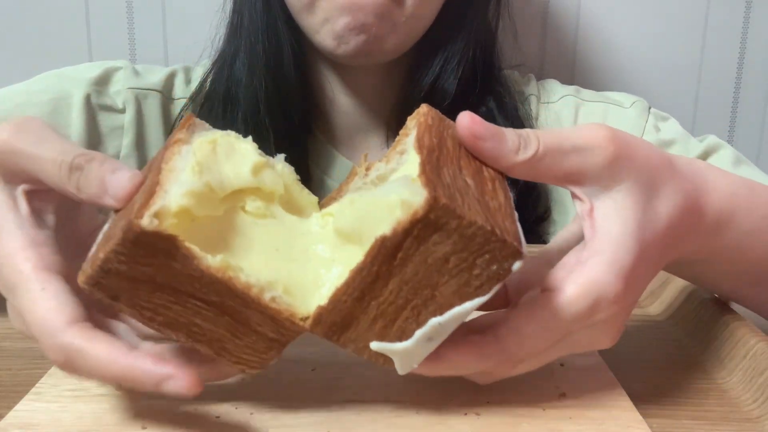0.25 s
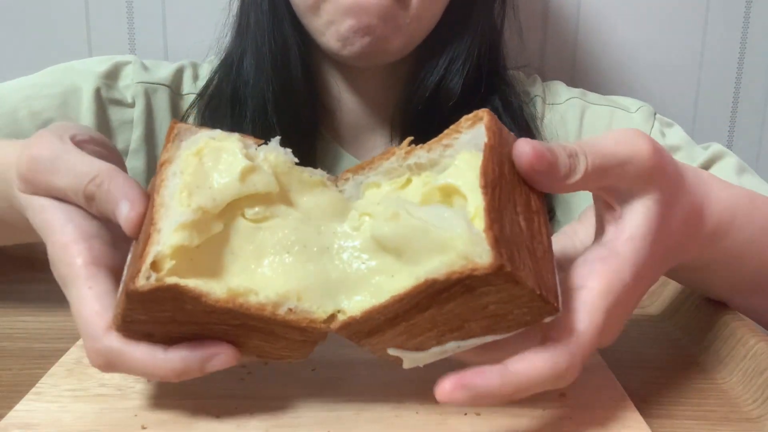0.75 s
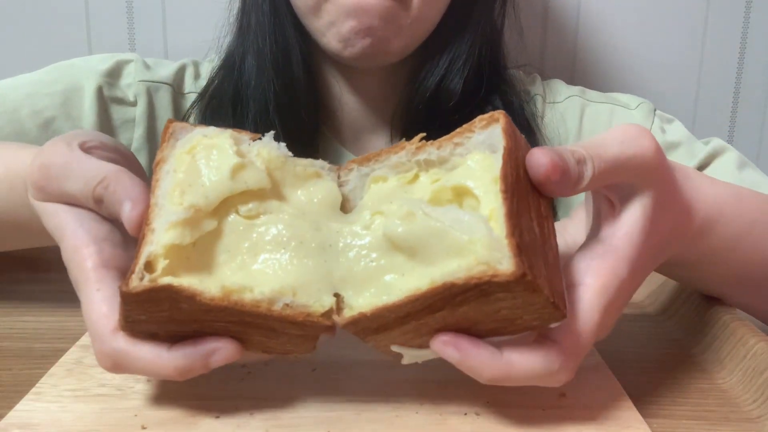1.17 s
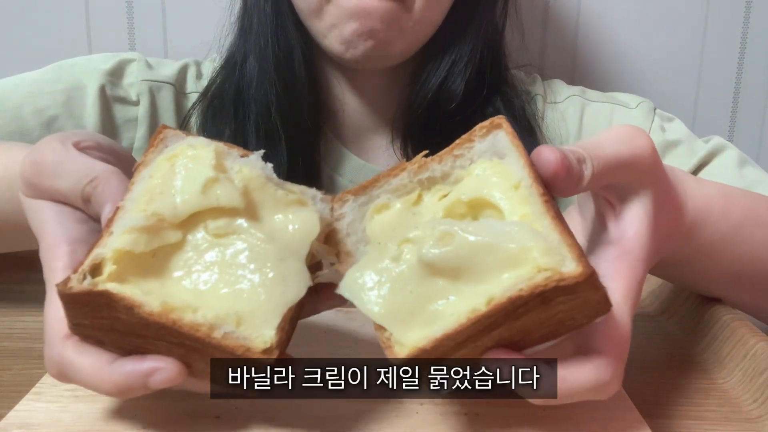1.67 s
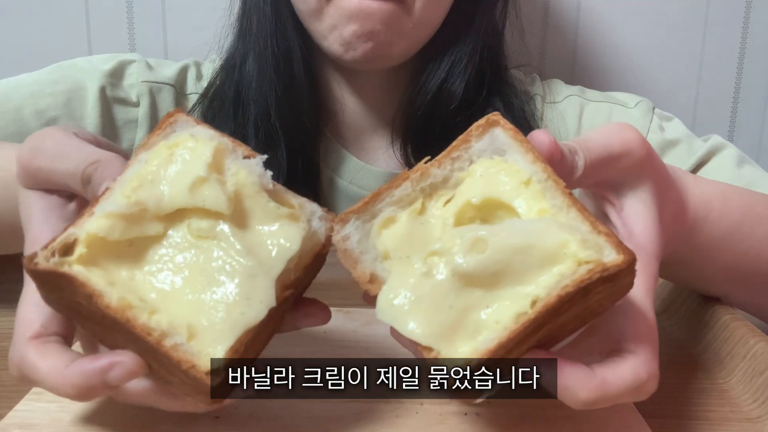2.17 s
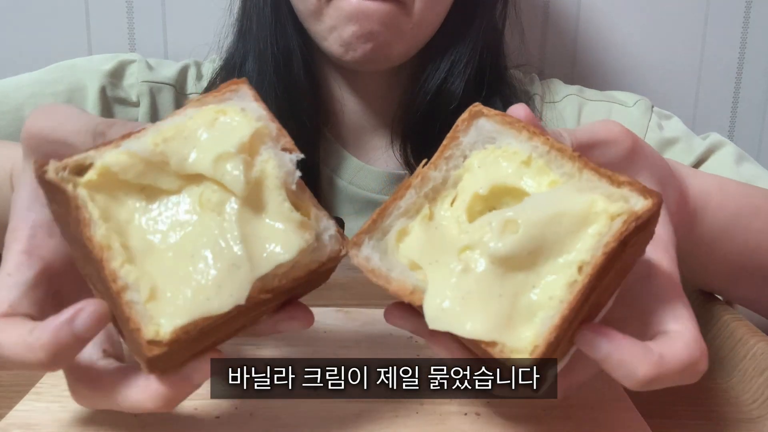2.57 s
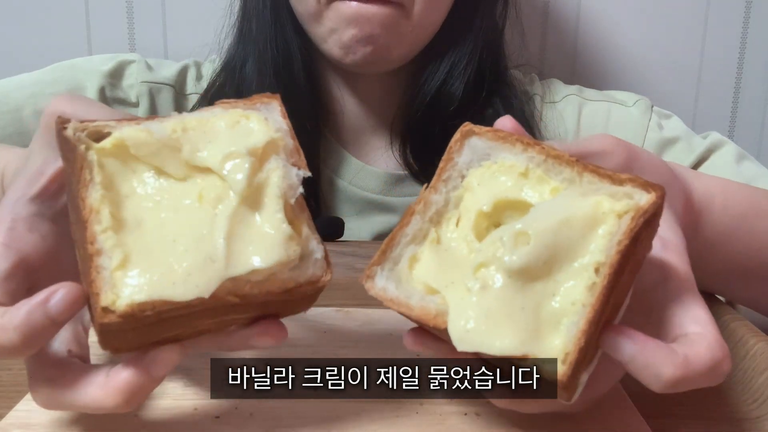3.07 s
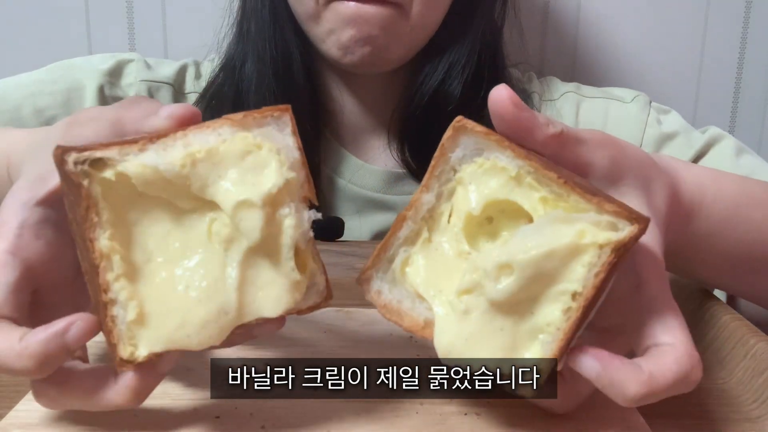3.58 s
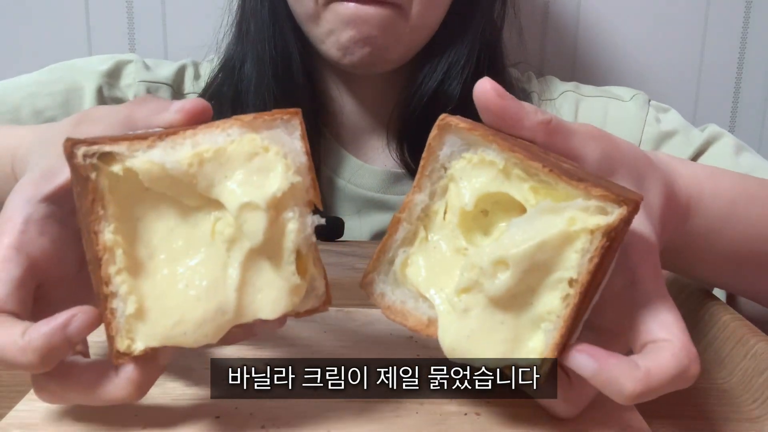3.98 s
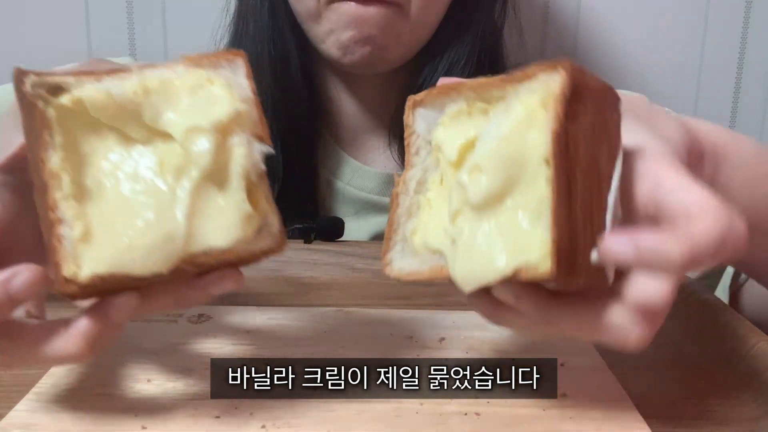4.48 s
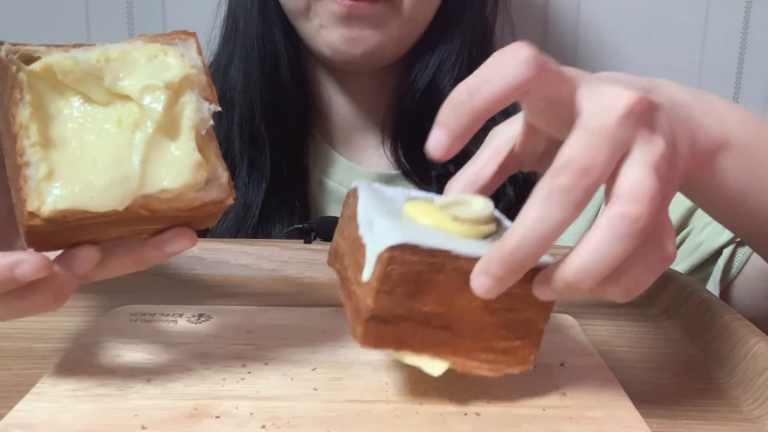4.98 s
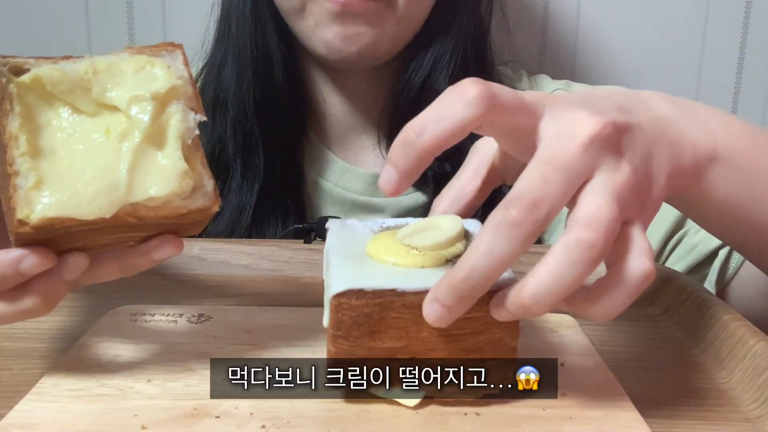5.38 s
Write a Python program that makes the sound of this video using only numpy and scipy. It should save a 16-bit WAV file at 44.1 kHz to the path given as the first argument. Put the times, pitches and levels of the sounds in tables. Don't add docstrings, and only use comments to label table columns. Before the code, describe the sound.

Close to the microphone, a crisp pastry is pulled apart by hand: a tiny crackle at first, then a dense burst of brittle snaps between one and two seconds, thinning to stray ticks. Later come a firm bump with a crack on a wooden board and soft rubs of skin and sleeve. A distant clock steps every second over quiet hiss and low building rumble.

```python
import sys
import numpy as np
from scipy import signal
from scipy.fft import rfft, irfft
from scipy.io import wavfile
from scipy.ndimage import uniform_filter1d

SR = 44100
rng = np.random.default_rng(int(sys.argv[2]) if len(sys.argv) > 2 else 0)


def log_audio(samples):
    frames = np.atleast_2d(samples).T
    limited = np.clip(frames, -1, 1)
    pcm = np.round(limited * 32767).astype(np.int16)
    wavfile.write(sys.argv[1], SR, pcm)


def gain_from_db(level_db):
    decades = np.asarray(level_db, float) / 20
    return 10 ** decades


N = 248724
TIME = np.arange(N) / SR

# [t/s, level/dB]
TRAFFIC = [(0.0, -75), (0.47, -76.5), (1.05, -69), (1.29, -78.5), (1.48, -73.5), (1.76, -72), (2.07, -71),
           (2.34, -76), (3.19, -75.5), (3.42, -68.5), (3.72, -77), (4.02, -74), (4.21, -69), (4.43, -75.5),
           (5.29, -77.5), (5.64, -70)]


def evened(x):
    return x / np.sqrt(np.mean(x ** 2) + 1e-20)


def peaked(x):
    return x / abs(x).max()


def add(mix, s, sound):
    part = mix[round(s * SR):][:len(sound)]
    part += sound[:len(part)]


def swell(curve):
    return np.interp(TIME, *np.transpose(curve))


def coloured(points):
    f, db = np.transpose(points)
    hz = np.fft.rfftfreq(N, 1 / SR)
    gain = gain_from_db(np.interp(np.log(hz + 0.028), np.log(f), db))
    return evened(irfft(rfft(rng.standard_normal(N)) * gain, N))


def resonate(x, hz, width):
    pole = np.exp((2j * np.pi * hz - np.pi * width) / SR)
    return 2 * signal.lfilter([1 - abs(pole)], [1, -pole], x).real


def body(x, modes):
    return sum((-1) ** k * gain_from_db(db) * resonate(x, hz, width) for k, (hz, width, db) in enumerate(modes))


def ringing(modes, t, phase):
    return sum(gain_from_db(db - 60 * t / t60) * np.sin(2 * np.pi * (hz * t + p))
               for (hz, db, t60), p in zip(modes, phase))


def outside():
    # [f/Hz, level/dB per Hz]
    sway = [(1, -12), (3, -3), (10, 0), (15, -3), (21, -21), (28, -42), (40, -62), (100, -130)]
    # [f/Hz, level/dB per Hz]
    boom = [(20, -33.5), (30, -14), (41, -2.5), (52, -5.5), (75, -21.5), (88, -18), (100, -25),
            (115, -25.5), (150, -34), (220, -75), (500, -120)]
    # [f/Hz, level/dB per Hz]
    murmur = [(110, -25), (170, -4), (225, 0), (330, -5.5), (440, -4.5), (620, -18), (1000, -34.5),
              (2500, -74), (6000, -100)]
    # [t/s, level/dB]
    shake = [(0.0, -52), (0.12, -46.5), (0.89, -50), (1.0, -39.5), (1.08, -53), (1.9, -41), (2.4, -54),
             (2.76, -43), (3.09, -51), (4.29, -47), (4.37, -42.5), (5.17, -48), (5.31, -39), (5.37, -53.5),
             (5.43, -40.5), (5.64, -46.5)]
    traffic_db = swell(TRAFFIC)
    sway_db = swell(shake) - 1.37
    boom_db = -54 + 0.067 * (traffic_db - traffic_db.mean())
    murmur_db = traffic_db + 1.54
    out = np.zeros(N)
    for points, db, span_s in ((sway, sway_db, .3), (boom, boom_db, .6), (murmur, murmur_db, .3)):
        noise = coloured(points)
        steady = noise / np.sqrt(uniform_filter1d(noise ** 2, round(span_s * SR)) + 0.072)
        out += steady * gain_from_db(db)
    return out * signal.windows.tukey(N, .012)


def microphone_hiss():
    # [f/Hz, level/dB per Hz]
    spectrum = [(300, -35), (550, 5.5), (900, 3), (1400, 0.5), (2200, -1.5), (4000, -3.5), (7000, -4),
                (9500, -5), (11500, -7), (13500, -8.5), (15800, -8.5)]
    traffic_db = swell(TRAFFIC)
    return gain_from_db(-74 + 0.069 * (traffic_db - traffic_db.mean())) * coloured(spectrum)


def clock():
    # [t/s, case level/dB, gear rattle level/dB, boost of the third case mode/dB]
    steps = [
        (0.207, -62.5, -61.5, 0.5),
        (1.205, -57.5, -76, 2),
        (2.205, -62, -60.5, 2),
        (3.208, -60.5, -59, 10),
        (4.206, -61, -61.5, -6),
        (5.208, -61.5, -62, -9),
    ]
    # [f/Hz, bandwidth/Hz, level/dB]
    gear_modes = [(3500, 430, -2), (5060, 710, 1.5), (5980, 200, 2), (7360, 630, 1.5)]
    # [f/Hz, level/dB, t60/s]
    tick = [(431, 15, 0.053), (768, 2, 0.45), (1027, 14, 0.12), (1367, 16, 0.21), (1564, 3, 0.15),
            (2013, 11.5, 0.19), (2310, -3, 0.54), (2790, -2, 0.18)]
    # [f/Hz, level/dB, t60/s]
    tock = [(403, 5, 0.32), (1414, 6.5, 0.19), (1460, -3, 0.36), (1750, 0.5, 0.28), (2240, -7, 0.2),
            (2130, 3, 0.18), (2960, -9, 0.2), (3500, 10, 0.025)]
    out, t = np.zeros(N), np.arange(6000) / SR
    lucks = rng.standard_normal((len(steps), 6000))
    for k, ((s, case_db, gears_db, mode_db), luck) in enumerate(zip(steps, lucks)):
        shake = np.roll(luck, 3000) * np.exp(-((t - .007) / .02) ** 2)
        case = sum(gain_from_db(db - 32.5) * resonate(shake, hz, 10 + 3.2 / t60) * np.sqrt(SR * t60)
                   for hz, db, t60 in (tick, tock)[k % 2])
        case = case + (gain_from_db(mode_db) - 1) * resonate(case, tick[2][0], 150)
        rattle = luck * np.minimum(t / 0.0066, 1) * np.exp(-(t / 0.02) ** 2)
        gears = peaked(body(rattle, gear_modes))
        step = gain_from_db(case_db) * case * np.minimum(t / .003, 1) + gain_from_db(gears_db) * gears
        add(out, s - .002, step)
    return out


def slides():
    # [t/s, length/s, level/dB, brightness/dB: cloth raised and skin lowered by it]
    strokes = [(.272, 0.036, -66.5, 7), (0.337, 0.12, -71, 9), (3.291, 0.093, -60.5, -2.5),
               (3.347, 0.13, -67.5, 5), (4.404, 0.17, -76, 9.5), (4.67, 0.15, -57.5, 4),
               (4.767, 0.11, -60.5, 4.5), (5.517, 0.15, -67, -0.5)]
    # [start t/s, end t/s, f/Hz, bandwidth/Hz, level/dB]
    squeaks = [
        (3.365, 3.4, 11100, 2500, -76),
    ]
    # [f/Hz, level/dB per Hz]
    skin = [(300, -1), (800, 3.5), (2000, 3.5), (3000, -11), (6000, -10.5), (12000, -29)]
    # [f/Hz, level/dB per Hz]
    cloth = [(1000, -3), (3500, -3), (6700, -7), (9000, -4.5), (15800, -5)]
    dull, bright = coloured(skin), coloured(cloth)
    grain = gain_from_db(2.5 * evened(uniform_filter1d(rng.standard_normal(N), size=200)))
    ends_db, squareness = -14, 2.6
    out = np.zeros(N)
    for s, length, db, tilt_db in strokes:
        on = (TIME > s) & (TIME < s + length)
        arch_db = ends_db * abs(2 * (TIME[on] - s) / length - 1) ** squareness
        rub = dull[on] / gain_from_db(tilt_db) + bright[on] * gain_from_db(tilt_db)
        add(out, s, grain[on] * gain_from_db(db + arch_db - 11) * rub)
    for start, end, hz, width, db in squeaks:
        slip = resonate(resonate(rng.standard_normal(4096), hz, width), hz, width)
        slip = slip[:round((end - start) * SR)]
        add(out, start, gain_from_db(db) * evened(slip) * signal.windows.tukey(len(slip), .3))
    return out


def tears():
    # [t/s, length/s, force level/dB, crack rate/per s, thinness/dB per octave]
    pulls = [(.404, 0.02, -62, 25000, 1.5), (.42, 0.017, -56.5, 24000, 1.5), (1.157, 0.06, -69.5, 2500, -2),
             (1.212, 0.034, -59, 3100, 0.5), (1.247, 0.023, -56, 6000, -3), (1.261, 0.018, -58, 6000, -2),
             (1.267, 0.094, -71, 3600, -.5), (1.368, 0.12, -75.5, 1600, -1.5),
             (1.588, 0.046, -70.5, 5000, -6.5), (1.655, 0.036, -66.5, 10400, -5.5),
             (1.687, 0.022, -68.5, 8200, -3.5)]
    # [f/Hz, bandwidth/Hz, level/dB]
    crust = [(900, 740, -12), (1780, 510, -5.5), (3220, 700, -1.5), (3900, 600, -11.5), (4480, 470, -2.5),
             (5700, 580, -7), (7150, 1500, 2), (8670, 1100, -4), (10500, 1600, -9.5), (13900, 3800, -10.5)]
    draw = rng.random(N)
    size_db = 4 * np.minimum(rng.exponential(1, N), 3)
    sign = rng.standard_normal(N)
    kind = rng.integers(0, len(crust), size=(4, N))
    out = np.zeros(N)
    for s, length, db, per_s, thin_db in pulls:
        on = (TIME > s) & (TIME < s + length)
        force_db = np.interp((TIME[on] - s) / length, [0, .6, 1], [-10.5, 0, -15])
        cracks = (gain_from_db(size_db) * sign)[on] * (draw[on] < per_s / SR) * gain_from_db(force_db)
        layer = np.zeros(on.sum())
        for k, (hz, width, flake_db) in enumerate(crust):
            struck = cracks * (kind[:, on] == k).any(0)
            ring = resonate(resonate(struck, hz, 3 * width), hz, width) / np.sqrt(width)
            layer += gain_from_db(flake_db + thin_db * np.log2(hz / 4000)) * ring
        add(out, s, gain_from_db(db) * evened(layer) * signal.windows.tukey(on.sum(), .04))
    return out


def snaps():
    # [t/s, level/dB, hollow f/Hz, flake f/Hz, crispness/dB]
    breaks = [(.407, -53, 1100, 7200, 8), (.4526, -60, 1370, 3500, 0), (.4935, -59, 1480, 4390, -9),
              (1.1897, -47.5, 1950, 5330, 1), (1.244, -43.5, 1680, 6100, 1), (1.2556, -53, 980, 4600, -4),
              (1.2672, -70, 1720, 6900, -4), (1.4184, -67, 1460, 7150, 2), (1.4405, -64, 1730, 5770, 5),
              (1.5622, -48, 1420, 6140, -4.5), (1.6103, -37, 1580, 2980, -2), (1.6382, -54, 1350, 3510, -5),
              (1.6631, -40.5, 1070, 3180, -6), (1.6905, -53, 1780, 4180, -6), (1.7307, -55, 1640, 9100, 3),
              (1.95, -41.5, 1620, 4200, 1.5), (2.291, -57.5, 1500, 4400, 0.5),
              (2.5792, -66, 1730, 6800, -3), (2.602, -60, 1400, 4100, -12), (2.6185, -58, 1460, 4100, -5),
              (2.634, -58, 1800, 4100, -6), (2.6855, -47, 1340, 2400, 0.5), (3.312, -37.5, 1070, 4300, -13),
              (3.32, -53.5, 1020, 4070, 1)]
    # [t/s, level/dB, flake f/Hz, thickness/dB]
    flakes = [(.8, -56.5, 3220, -18), (1.126, -60, 7000, -15), (1.1659, -60, 6240, -18),
              (1.175, -52, 6310, -14), (1.1827, -54, 7850, -4), (1.205, -49, 8310, -9),
              (1.2185, -43.5, 5150, -15), (1.2265, -49, 7030, -2), (1.235, -35, 3270, -8),
              (1.2594, -32, 4350, -11.5), (1.273, -54, 7000, -9), (1.2971, -45, 8100, -12),
              (1.3082, -58, 5840, -9), (1.325, -65, 5740, -16), (1.3344, -54, 5700, -13),
              (1.3365, -53, 5700, -21), (1.355, -57, 7130, -1), (1.3981, -62, 5950, -17),
              (1.461, -59, 5990, -19), (1.6132, -56, 7360, -20), (1.6258, -59, 5810, -5),
              (1.6716, -45.5, 4730, -7), (1.698, -58.5, 5980, 3.5), (1.7428, -58, 6130, -11),
              (1.7593, -53.5, 8800, -19), (1.93, -55, 4150, -5), (2.318, -58.5, 8490, -7),
              (4.6725, -49.5, 5570, -17), (4.754, -55, 5840, -12)]
    # [t/s, level/dB, flake f/Hz]
    crumbs = [(.6594, -60.5, 5730), (.7646, -58, 8500), (1.1441, -55, 3900), (1.849, -51, 8650),
              (2.1003, -53, 5300), (3.0984, -47.5, 6040), (3.1517, -69, 7560), (3.4866, -57, 12200),
              (3.5403, -62, 7360), (4.978, -63, 5500)]
    # [f/Hz, bandwidth/Hz, level/dB]
    shell_modes = [(3150, 600, 8), (4960, 570, 13), (6040, 1400, 9), (8250, 4000, -9.5)]
    loaf_hz = 1730
    rows = [(s, low_hz, db, hz, db + crisp_db, db + crisp_db - 5) for s, db, low_hz, hz, crisp_db in breaks]
    rows += [(s, loaf_hz, db + thick_db, hz, db, db - 11) for s, db, hz, thick_db in flakes]
    rows += [(s, loaf_hz, db - 32, hz, db - 7, db) for s, db, hz in crumbs]
    out, t = np.zeros(N), np.arange(512) / SR
    afters = rng.standard_normal((len(rows), 512))
    for (s, hollow_hz, hollow_db, flake_hz, flake_db, edge_db), after in zip(rows, afters):
        crack = 0.079 * after * np.exp(-t / 0.0013)
        crack[0] = 1
        hollow = resonate(resonate(crack, hollow_hz, 3600), hollow_hz, 990)
        hollow = hollow + 0.15 * resonate(crack, 840, 790)
        hollow = resonate(resonate(hollow, 1450, 2600), 1450, 5000)
        shell = resonate(body(crack, shell_modes), 4300, 7700)
        flake = peaked(resonate(resonate(crack, flake_hz, 2400), flake_hz, 1200)) + 1.6 * peaked(shell)
        splinter = crack + 0.31 * after * np.exp(-t / 0.00068)
        edge = resonate(resonate(resonate(splinter, 8200, 8800), 7800, 7600), 8700, 6700)
        snap = gain_from_db(hollow_db) * peaked(hollow) + gain_from_db(flake_db) * peaked(flake)
        add(out, s, snap + gain_from_db(edge_db) * peaked(edge))
    return out


def knocks():
    # [t/s, level/dB, share of the lowest mode/dB]
    bumps = [
        (0.411, -68, 17.5),
        (1.257, -60.5, 2.5),
        (3.3125, -56.5, 1.5),
        (3.32, -56.5, -8),
    ]
    # [f/Hz, level/dB, t60/s]
    board = [(248.6, -3, 0.08), (451, 2.5, 0.038), (566, -4.5, 0.082), (700, -32, 0.1), (844, 0.5, 0.055),
             (998, 13, 0.019), (1100, -0.5, 0.052), (1500, -28, 0.15), (1976, -5.5, 0.03)]
    out, t = np.zeros(N), np.arange(6000) / SR
    for (s, db, low_db), phase in zip(bumps, rng.random((len(bumps), 10))):
        ring = ringing(board[1:], t, phase) + gain_from_db(low_db) * ringing(board[:1], t, phase)
        add(out, s, gain_from_db(db) * ring * np.minimum(t / 0.0031, 1))
    return out


def room(x):
    taps, at = np.zeros(6000), np.arange(60, 5980, 20)
    taps[at + rng.integers(0, 20, len(at))] = rng.choice([-1., 1.], len(at))
    decay = gain_from_db(-60 * np.arange(6000) / SR / .07)
    tail = signal.lfilter([1], [1, -.4], taps * decay)
    return signal.oaconvolve(x, tail / np.linalg.norm(tail))[:N]


def scene():
    pastry = snaps() + tears() + knocks()
    near = pastry + gain_from_db(-26.5) * room(pastry) + slides()
    return (near + clock() + outside() + microphone_hiss())[None]


def low_pass(x):
    return signal.sosfilt(signal.butter(12, 16430, fs=SR, output="sos"), x)


def record(dry):
    padded = np.pad(dry, ((0, 0), (255, 255)), "reflect", reflect_type="odd")
    lowpass = signal.firwin(511, 15800, window=("kaiser", 9), fs=SR)
    limited = signal.oaconvolve(padded, lowpass[None], "valid")
    return low_pass(limited)


dry = scene()
out = record(dry)
log_audio(out)
```